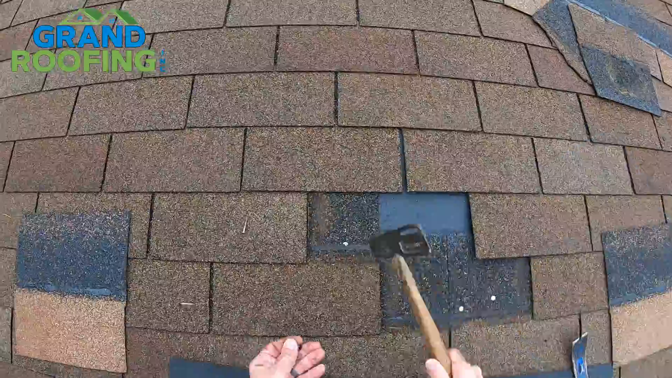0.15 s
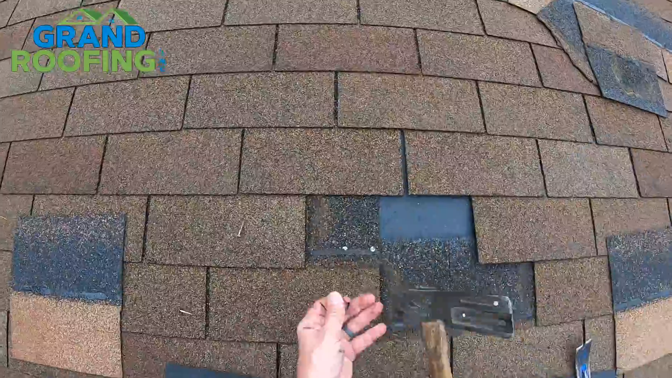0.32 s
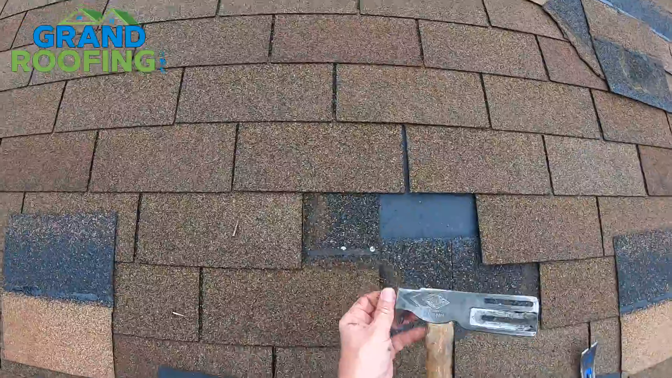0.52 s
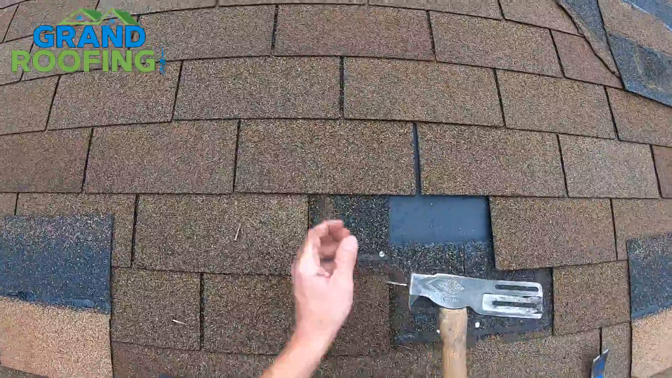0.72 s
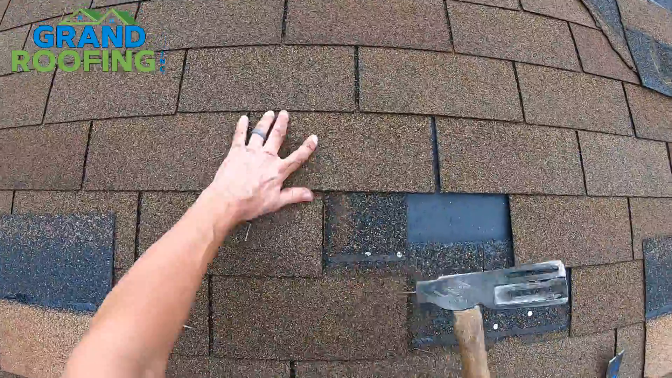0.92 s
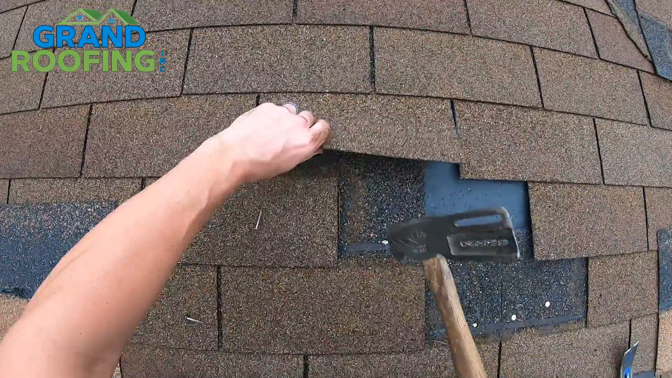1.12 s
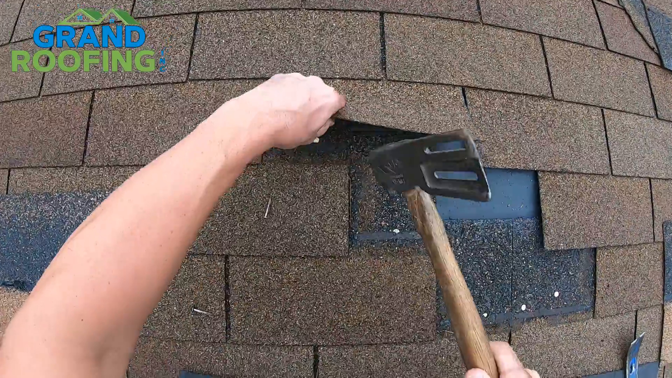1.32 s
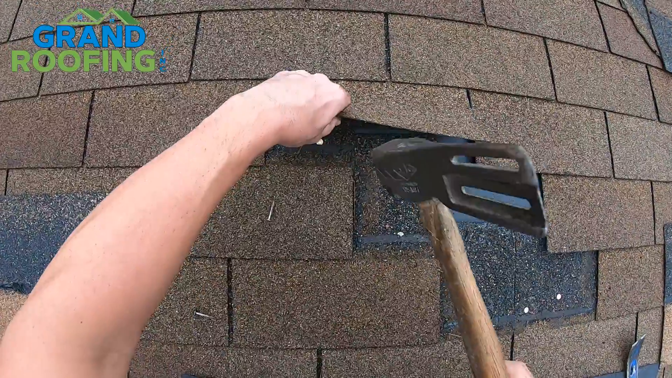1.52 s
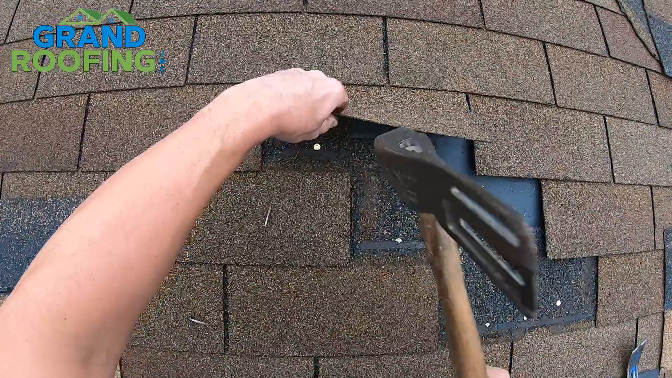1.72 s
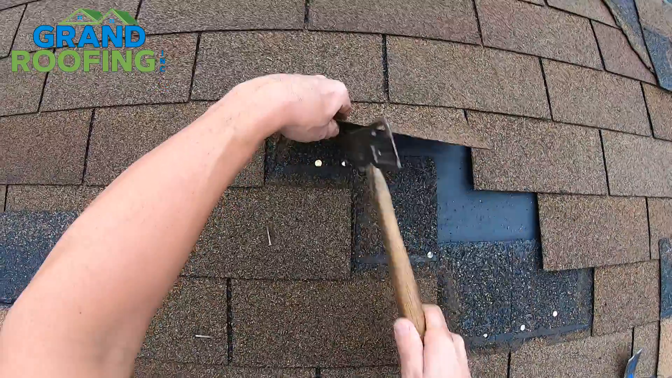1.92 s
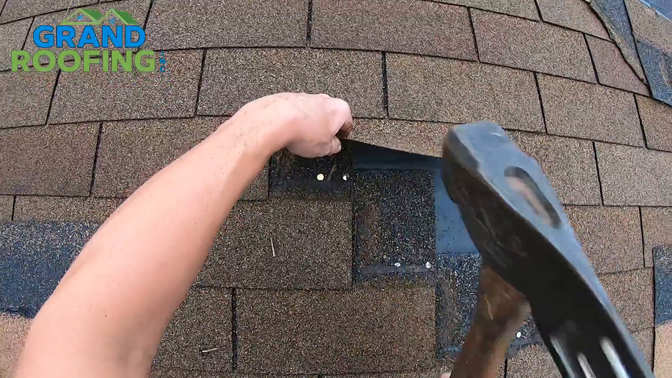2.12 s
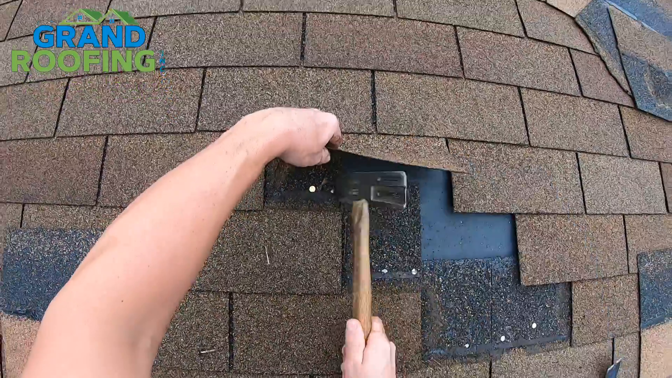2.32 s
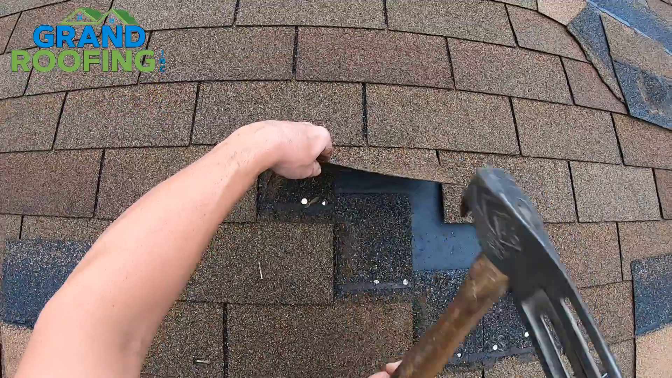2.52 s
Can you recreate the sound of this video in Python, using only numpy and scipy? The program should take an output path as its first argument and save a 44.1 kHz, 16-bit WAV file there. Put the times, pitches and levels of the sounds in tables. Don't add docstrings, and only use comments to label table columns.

```python
import sys
import numpy as np
from scipy import signal
from scipy.fft import rfft, irfft
from scipy.io import wavfile

SR = 44100
rng = np.random.default_rng(int(sys.argv[2]) if len(sys.argv) > 2 else 0)


def makeup_ratio(level_db):
    decades = np.asarray(level_db, float) / 20
    return 10 ** decades


def wav_record(signal):
    frames = np.transpose(np.atleast_2d(signal))
    bounded = np.clip(frames, -1, 1)
    quanta = np.round(bounded * 32767).astype(np.int16)
    wavfile.write(sys.argv[1], SR, quanta)


N = 119070


def at_hz(points, hz):
    points = np.array(points)
    return np.interp(np.log(hz), np.log(points[:, 0]), points[:, 1])


def rms_one(x):
    return x / np.sqrt(np.mean(x ** 2) + 1e-20)


def peak_one(x):
    return x / abs(x).max()


def ring(clicks, hz, t60):
    r = makeup_ratio(-60 / (t60 * SR))
    w = 2 * np.pi * hz / SR
    return signal.lfilter([0, np.sin(w)], [1, -2 * r * np.cos(w), r * r], clicks + 1e-18)


def band(x, hz, octaves):
    edges = [hz * 2 ** (-octaves / 2), min(hz * 2 ** (octaves / 2), SR / 2.2)]
    return signal.sosfilt(signal.butter(2, edges, "band", fs=SR, output="sos"), x)


def drift(rate):
    knots = np.arange(0, N + SR, int(SR / rate))
    return rms_one(np.interp(np.arange(N), knots, rng.standard_normal(len(knots))))


def add(out, s, sound, pan_db=0):
    i = int(s * SR)
    n = min(sound.shape[-1], N - i)
    out[:, i:i + n] += sound[..., :n] * makeup_ratio(np.array([[pan_db / 2], [-pan_db / 2]]))


def grains(size):
    chance, strength, sign = rng.random((3, size))
    hits = chance < 6000 / SR
    return rms_one(hits * makeup_ratio(-2.8 * np.log(strength + 1e-3)) * np.sign(sign - .5))


def hum_and_hiss():
    # frequency in Hz, level in dB per Hz
    spectrum = [(59, -30), (100, -1), (289, -6), (1080, -15), (3940, -22), (5080, -21.5), (6840, -26),
                (10900, -46), (16000, -46.5)]
    # frequency in Hz, likeness (1 = same in both ports)
    likeness = [(60, -0.84), (240, 0.93), (950, 0.27), (3770, -1.1), (15000, -0.074)]
    out, white = 0, rng.standard_normal((2, 2, N))
    for k, hz in enumerate(110 * 2 ** np.arange(0, 7.3, .5)):
        mid, side = band(white[k % 2], hz, 0.36)
        alike = np.clip(at_hz(likeness, hz), 0, 1)
        stereo = np.sqrt(1 + alike) * mid + np.sqrt(1 - alike) * side * [[1], [-1]]
        out = out + makeup_ratio(at_hz(spectrum, hz) + 0.63 * drift(24)) * stereo
    return makeup_ratio(-68) * rms_one(out)


def insects():
    hz, width_hz = 4850, 700
    chorus = rms_one(band(rng.standard_normal((2, N)), hz, width_hz / hz / np.log(2)))
    return makeup_ratio(-82 + 2 * drift(6.4)) * chorus


def wind():
    mid, side = rng.standard_normal((2, N))
    lumps = rms_one(band(mid + .15 * side * np.array([[1], [-1]]), 65.4 / 2, 0.86))
    return makeup_ratio(-65 + 2.5 * drift(15)) * lumps


def ticks():
    # start in seconds, peak in dB,
    # pitch in Hz
    contacts = [(0.358, -25, 3800), (0.3663, -32, 4330), (0.4129, -49, 3470), (0.584, -50, 3430),
                (0.9396, -38, 3330), (1.0003, -44.5, 2200), (1.017, -45, 2730), (1.115, -43, 2380),
                (1.1285, -29, 3200), (1.1324, -28, 4340), (1.1674, -46, 4480), (1.1942, -41.5, 9000),
                (1.2041, -51, 4720), (1.3145, -51, 3770), (1.4029, -44, 3620), (1.422, -44.5, 1830),
                (1.5872, -49.5, 2906), (1.6199, -43.5, 3340),
                (1.858, -51, 5200), (1.877, -45, 1980), (1.914, -31, 3450), (2.0194, -32.5, 4070),
                  (2.0282, -21, 3330), (2.045, -34.5, 3350), (2.0753, -46.5, 5100), (2.1232, -51, 3100),
                  (2.1668, -51, 1675), (2.2056, -53, 3620), (2.2375, -52, 3540), (2.2948, -48.5, 5240),
                  (2.304, -44.5, 3316), (2.5453, -41.5, 3430), (2.598, -46.5, 2300), (2.6568, -44.5, 3560),
                (.014, -54.5, 3300), (0.054, -59, 3900), (.2475, -43.5, 2500), (0.2535, -51, 5200),
               (0.266, -46, 4800), (.377, -44, 3200), (.422, -58, 8000), (0.45, -50, 2100),
               (.482, -52, 2200), (.5043, -55.5, 3000), (0.53, -55, 6000), (.5551, -58.5, 2160),
               (0.7849, -59, 5010), (1.111, -46.5, 2500), (1.145, -52, 3500), (1.227, -54, 7500),
               (1.2434, -50.5, 2200), (1.272, -55.5, 6000), (1.322, -57.5, 3600), (1.328, -54.5, 3600),
               (1.362, -57, 4620), (1.131, -35, 1110), (1.8432, -59, 4830), (1.9513, -28, 5000),
               (1.9553, -36, 6500), (1.963, -32.5, 4000), (1.973, -33, 2600), (1.987, -32.5, 2800),
               (2.053, -42.5, 2500), (2.1819, -54.5, 6500), (2.211, -58.5, 8000), (2.3277, -61, 5500),
               (2.3472, -55.5, 8000), (2.4469, -40, 3000), (2.4512, -49.5, 4000), (2.4601, -41, 2200),
               (2.4715, -45, 3500), (2.5014, -27.5, 3100), (2.523, -41.5, 2600), (2.587, -56, 7000)]
    out, t = np.zeros((2, N)), np.arange(SR // 40) / SR
    for s, db, hz in contacts:
        burst = rng.standard_normal(len(t)) * np.exp(-t / .001)
        tone = ring(burst, hz, 7.0 / hz)
        wide = band(band(burst, np.sqrt(hz * 2400), 2.2), 2600, 3)
        sound = peak_one(tone) + makeup_ratio(-2) * peak_one(wide)
        add(out, s, makeup_ratio(db - 4) * sound, -5 + rng.normal(0, 2.5))
    return out


def bumps():
    # start in seconds, length in seconds, level in dB, pitch in Hz
    pushes = [(0.047, .1, -66.5, 50), (0.303, .12, -56.5, 110), (0.317, .04, -55, 320),
              (.44, 0.18, -67, 298), (0.701, .09, -57, 60), (0.938, 0.025, -52.5, 132),
              (.99, 0.058, -54.5, 50), (1.098, 0.11, -72, 60), (1.42, 0.098, -60.5, 60),
              (1.523, 0.073, -56, 49.7), (1.646, .13, -59, 55), (1.827, 0.051, -57.5, 50.4),
              (2.027, 0.047, -63, 330), (2.079, 0.082, -57, 58.8), (2.466, 0.097, -52, 202),
              (2.561, 0.078, -58, 58.4)]
    out = np.zeros((2, N))
    for s, length, db, hz in pushes:
        n = int(length * SR)
        mid, side = rng.standard_normal((2, 1, SR // 2))
        noise = band(mid + 0.17 * side * [[1], [-1]], hz, 1.53)
        lump = noise[:, -n:] * np.hanning(n) ** .5
        add(out, s, makeup_ratio(db) * rms_one(lump))
    return out


def scrapes():
    # start in seconds, length in seconds, level in dB, pitch in Hz, left over right in dB
    strokes = [(0.355, 0.047, -69, 4170, -11), (0.379, 0.13, -73, 2350, -4), (0.951, 0.035, -59.5, 1800, 5),
               (.968, 0.035, -60.5, 3000, 0.5), (0.969, 0.024, -63.5, 6000, 4),
               (0.995, 0.048, -73.5, 1800, 20), (1.034, 0.083, -63.5, 1960, 2.5),
               (1.113, 0.052, -69, 2950, 11), (1.166, 0.039, -66.5, 4130, 4.5),
               (1.61, 0.037, -73.5, 3860, -22), (1.872, 0.18, -67, 2500, -15),
               (1.969, 0.082, -50, 1170, -9.5), (1.989, 0.049, -53.5, 3500, 10),
               (2.012, 0.1, -71.5, 3170, 13), (2.425, 0.15, -61.5, 2560, 7),
               (2.479, 0.005, -48.5, 4650, -10), (2.491, 0.021, -46, 3430, 4.5),
               (2.498, 0.023, -47.5, 1020, -17), (2.507, 0.12, -71, 2500, 5),
               (2.39, 0.043, -58.5, 4500, -6.5), (1.925, 0.044, -58, 4020, -1.5),
               (.203, .014, -58.5, 2970, -5), (1.179, .03, -64, 9100, 6), (1.214, 0.24, -81, 4930, 3),
               (2.0, .018, -49, 4100, -3), (0.939, 0.14, -65.5, 800, -2), (2.478, 0.013, -43.5, 990, -11.5),
               (2.496, .02, -45, 9500, 4), (1.63, .25, -77, 4700, -4)]
    out = np.zeros((2, N))
    for s, length, db, hz, pan_db in strokes:
        grit = grains(SR // 4)
        sound = rms_one(band(grit, hz, 1.0))
        sound += .6 * rms_one(band(grit, 3000, 2.6))
        sound += makeup_ratio(-14) * rms_one(band(grit, 13000, .7))
        sound *= makeup_ratio(2.5 * drift(250)[:len(grit)])
        n = int(length * SR)
        stroke = np.sin(np.pi * (np.arange(n) / n) ** .75)
        add(out, s, makeup_ratio(db) * sound[:n] * stroke, pan_db)
    return out


def crack(k):
    # frequency in Hz, t60 in seconds, then level in dB in each blow
    steel = [(2695, .007, -4, -5, 1), (3136, 0.0079, -3.5, -0.5, 1), (1907, 0.005, -11, -9.5, -8),
             (4530, 0.0081, -1.5, -10.5, -21.5), (5634, 0.0034, -7, -11, -21.5),
             (7000, 0.009, -16, 3, -31.5), (8645, 0.0074, -16, -10, -32)]
    t = np.arange(SR // 2) / SR
    burst = rng.standard_normal(len(t)) * np.exp(-t / .0007)
    return sum(makeup_ratio(db[k]) * peak_one(ring(burst, hz, t60)) for hz, t60, *db in steel)


def thud(hz, fall):
    t = np.arange(SR // 2) / SR
    phase = 2 * np.pi * (hz * t + .78 * (1 - np.exp(-t / .0015)))
    return makeup_ratio(-20 * (t / fall) ** 2.1) * np.sin(phase) * (1 - np.exp(-t / .0009))


def boards(k):
    # frequency in Hz, t60 in seconds, then level in dB re the thud in each blow
    planks = [(231.4, 0.039, -15, -16, -15), (362, .03, 2, -6, -9), (540, 0.019, -3, -12.5, -11),
              (740, 0.032, -0.5, -7, -4.5), (1020, 0.025, -12, -12.5, -16.5)]
    push = np.exp(-np.arange(SR // 2) / SR / .0005) / (.0005 * SR)
    return sum(makeup_ratio(db[k]) * ring(push, hz * rng.uniform(1.0, 1.03), t60) for hz, t60, *db in planks)


def rumble():
    # frequency in Hz, level in dB, t60 in seconds
    rafters = [(55, 9, .33), (110, 5.5, 0.27), (242, -5.5, .3)]
    out, t = 0, np.arange(SR // 2) / SR
    for hz, db, t60 in rafters:
        out = out + makeup_ratio(db - 60 * t / t60) * rms_one(band(rng.standard_normal(len(t)), hz, 1.1))
    return out


def clatter():
    # frequency in Hz, level in dB, t60 in seconds
    shingles = [(370, -3.5, .05), (785, 3, .035), (1750, -13.5, 0.039), (3200, -4.5, 0.031),
                (6000, -17.5, 0.02), (9424, -23, 0.027)]
    out, t = 0, np.arange(SR // 2) / SR
    for hz, db, t60 in shingles:
        grit = grains(len(t)) + makeup_ratio(-9) * grains(len(t)) * [[1], [-1]]
        settle = makeup_ratio(-29 + 2.5 * np.log2(hz / 3000) - 60 * t / 0.29)
        fade = (makeup_ratio(-60 * t / t60) + settle) * (1 - np.exp(-t / 0.00033))
        out = out + makeup_ratio(db) * rms_one(band(grit, hz, 0.77)) * fade
    return out


def through_ports(x):
    # frequency in Hz, difference in dB
    port_db = [(290, -.5), (640, -1.5), (1100, -2), (3100, -1), (9000, -1.5)]
    # frequency in Hz, phase lead in radians
    port_rad = [(200, 0.028), (500, 0.24), (1000, 0.33), (2000, 0.93), (9000, 1)]
    hz = np.maximum(np.fft.rfftfreq(N, 1 / SR), 1)
    half = makeup_ratio(at_hz(port_db, hz) / 2) * np.exp(.5j * at_hz(port_rad, hz))
    return irfft(rfft(x) * [half, 1 / half], N)


def blows():
    # start in seconds, then crack, clatter and rumble levels in dB
    strikes = [
        (0.216, -10, -15.5, -38.5),
        (1.9395, -15, -15, -39),
        (2.4127, -11.5, -21.5, -39.5),
    ]
    # start in seconds, level in dB, pitch in Hz, seconds to fall 20 dB
    thuds = [
        (0.2173, -6, 140, .013),
        (1.9417, -5.5, 88, .0195),
        (2.4128, -6.5, 84, .021),
    ]
    out = np.zeros((2, N))
    for k, (s, crack_db, clatter_db, rumble_db) in enumerate(strikes):
        later, thud_db, hz, fall = thuds[k]
        add(out, later, makeup_ratio(thud_db) * thud(hz, fall))
        sound = makeup_ratio(crack_db) * crack(k) + makeup_ratio(thud_db) * boards(k)
        sound = sound + makeup_ratio(rumble_db) * rumble() + makeup_ratio(clatter_db) * clatter()
        add(out, s, sound)
    return through_ports(out)


def head():
    # frequency in Hz, level in dB, t60 in seconds
    modes = [(3512, 0, .9), (3380, -12, .4), (6660, -3, 1.0), (7695, 0, .8)]
    # struck at and damped at in seconds, fade in seconds, low-mode and high-mode levels in dB
    rings = [
        (0.232, 0.363, .006, -53.5, -80),
        (.362, 0.64, .05, -73, -71),
        (0.581, 0.714, .09, -67.5, -86),
        (2.512, 2.668, 0.04, -68.5, -84),
    ]
    out = np.zeros((2, N))
    for s, end, fade, low_db, high_db in rings:
        t = np.arange(int((end - s) * SR)) / SR
        edge = np.minimum(1, np.minimum(t / 0.012, (t[-1] - t) / fade))
        edge = edge * makeup_ratio(1.7 * drift(70)[:len(t)])
        tone = 0
        for hz, db, t60 in modes:
            level = low_db if hz < SR / 10 else high_db
            tone = tone + makeup_ratio(level + db - 60 * t / t60) * np.sin(2 * np.pi * hz * t)
        add(out, s, edge * tone, pan_db=-1.0)
    return out


def bird():
    # time in seconds, pitch in Hz, level in dB
    glide = [
        (1.528, 6400, -84),
        (1.55, 7050, -75),
        (1.6, 7000, -83),
        (1.66, 6800, -79),
        (1.74, 6900, -92),
    ]
    s, hz, db = np.transpose(glide)
    t = np.arange(N) / SR
    waver = 1 + .005 * drift(90) + .03 * drift(2500)
    phase = 2 * np.pi * np.cumsum(np.interp(t, s, hz) * waver) / SR
    level = makeup_ratio(np.interp(t, s, db, -200, -200) + 4.5 * drift(60))
    upper = makeup_ratio(-9 + 3.5 * drift(39.0)) * np.sin(1.18 * phase)
    return level * (np.sin(phase) + upper) * makeup_ratio(np.array([[-3.], [3.]]))


def scene():
    background = hum_and_hiss() + insects() + wind()
    return background + ticks() + bumps() + scrapes() + blows() + head() + bird()


def roll_off(x):
    return signal.sosfilt(signal.butter(12, 16450, fs=SR, output="sos"), x)


def record(dry):
    # shift in seconds (negative = early), level in dB
    smear = [(-.022, -29.5), (-.0108, -19), (0.0134, -33.5)]
    lows = signal.sosfilt(signal.butter(2, 834, fs=SR, output="sos"), dry)
    x = dry + sum(makeup_ratio(db) * np.roll(lows, int(s * SR), axis=1) for s, db in smear)
    x = 0.81 * np.tanh(x / 0.64)
    x = signal.sosfilt(signal.butter(1, 28, "high", fs=SR, output="sos"), x)
    droop = signal.sosfilt(signal.butter(5, 9000, fs=SR, output="sos"), x)
    return roll_off(droop + makeup_ratio(-30.5) * x)


dry = scene()
out = record(dry)
wav_record(out)
```